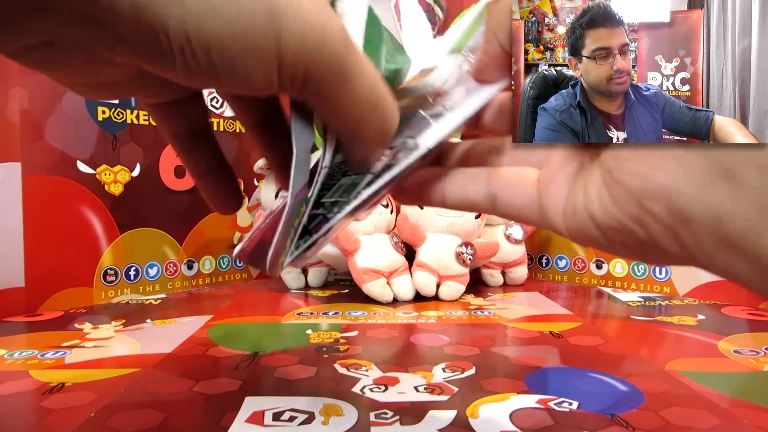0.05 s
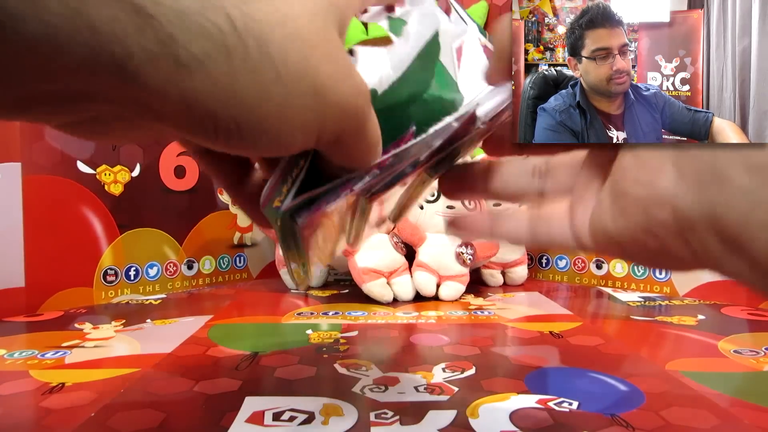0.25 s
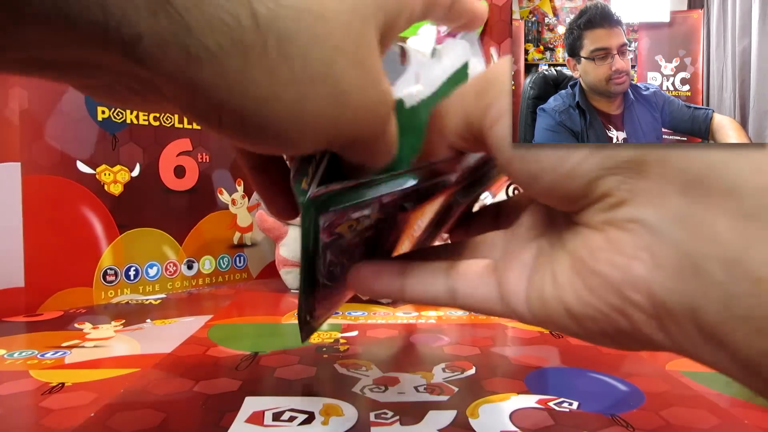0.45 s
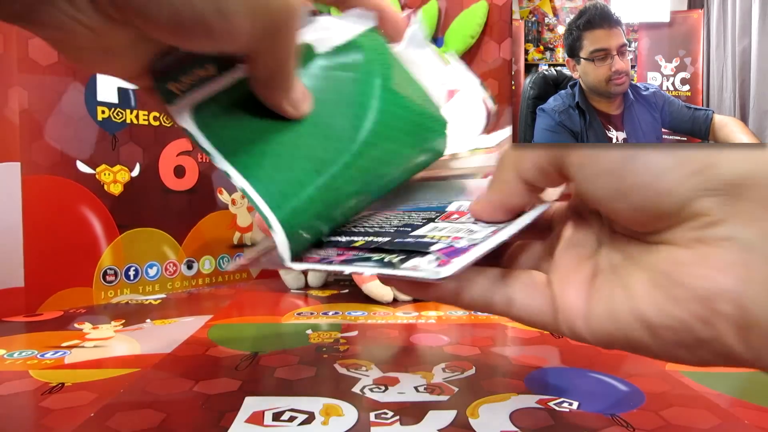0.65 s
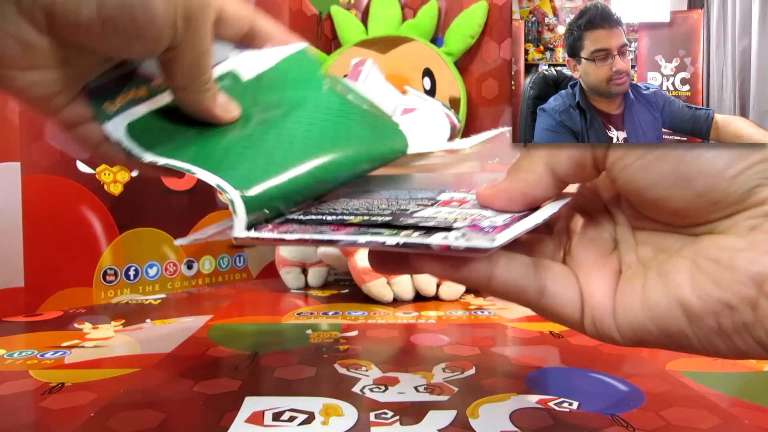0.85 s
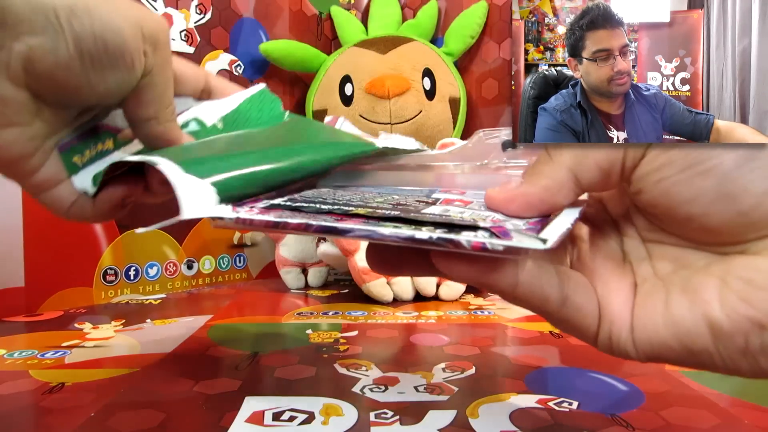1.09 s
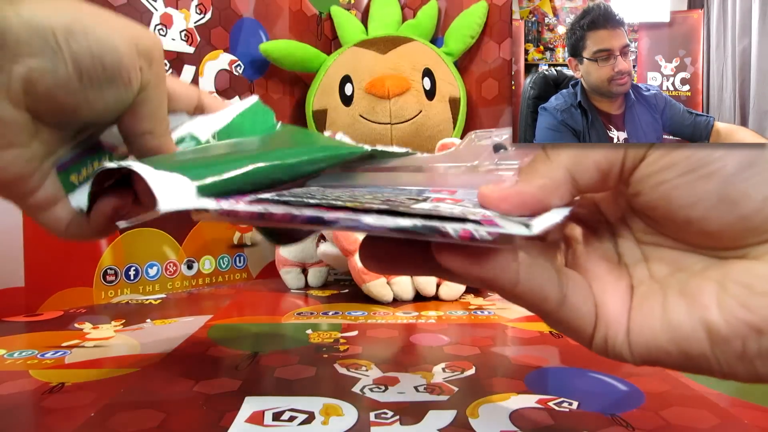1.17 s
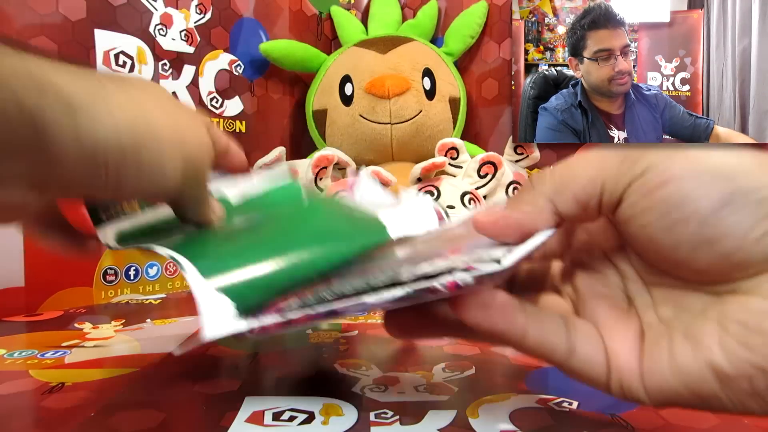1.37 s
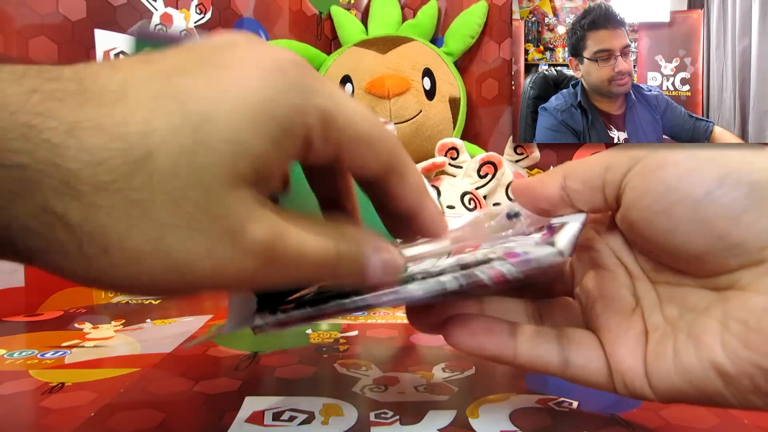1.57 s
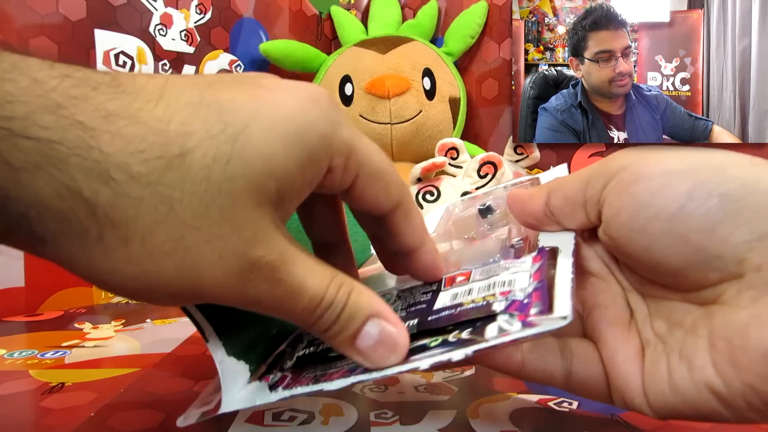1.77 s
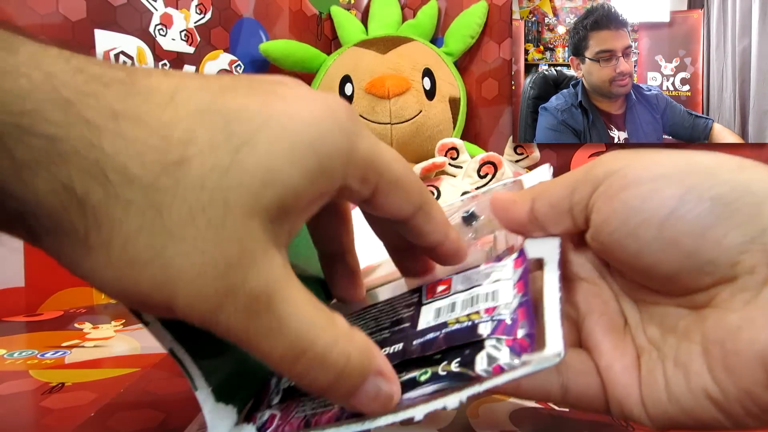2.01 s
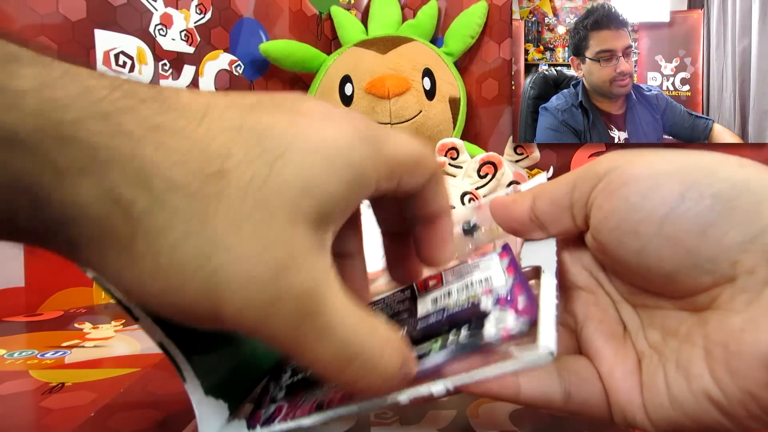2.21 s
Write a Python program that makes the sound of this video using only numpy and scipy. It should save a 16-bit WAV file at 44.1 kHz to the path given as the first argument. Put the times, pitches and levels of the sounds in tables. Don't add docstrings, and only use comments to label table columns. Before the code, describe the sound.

A card-backed plastic pack is torn open by hand with hollow pops, sharp cracks and crackling

```python
import sys
import numpy as np
from scipy import signal
from scipy.fft import rfft, irfft, next_fast_len
from scipy.io import wavfile
from scipy.ndimage import map_coordinates

SR = 44100
rng = np.random.default_rng(int(sys.argv[2]) if len(sys.argv) > 2 else 0)


def decibels_to_gain(level_db):
    exponent = np.asarray(level_db, float) / 20
    return 10 ** exponent


def master_out(mix):
    frames = np.transpose(np.atleast_2d(mix))
    ceiling = np.clip(frames, -1, 1)
    pcm = np.round(ceiling * 32767).astype(np.int16)
    wavfile.write(sys.argv[1], SR, pcm)


N = 99225


def unit(x):
    return x / np.sqrt(np.mean(x ** 2) + 1e-20)


def along(points, hz):
    point_hz, value = np.transpose(points)
    return np.interp(np.log(hz + 1), np.log(point_hz + 1), value)


def curves(rows):
    when_s, *columns = np.transpose(rows)
    t = np.arange(N) / SR
    return [np.interp(t, when_s, column) for column in columns]


def wobble(rate):
    return map_coordinates(rng.standard_normal(1000), [np.arange(N) * rate / SR])


def filtered(x, response):
    size = next_fast_len(x.shape[-1] + 8192)
    spectrum = rfft(x, size) * response(np.fft.rfftfreq(size, 1 / SR))
    return irfft(spectrum, size)[..., :x.shape[-1]]


def peak(f, hz, width_hz):
    return 1j * f * width_hz / (hz * hz - f * f + 1j * f * width_hz + 1e-9)


def apart(pair):
    difference = 0.4 * pair[1]
    return np.array([pair[0] + difference, pair[0] - difference])


# pitch_hz [Hz], width_hz [Hz], level_db [dB]
CARD_MODES = [(296, 140, 1.5), (810, 228, 4), (1240, 143, 7), (1410, 500, 1), (2020, 415, 3.5),
              (3110, 970, -2.5)]


def card_body(f, uneven_db):
    total = 0
    for k, (hz, width_hz, level_db) in enumerate(CARD_MODES):
        total = total + (-1) ** k * decibels_to_gain(level_db + uneven_db[k]) * peak(f, hz, width_hz)
    return total


# start_s [s], level_db [dB peak], pitch_hz [Hz], fade_60db_s [s]
CARD_POPS = [(0.204, -16.5, 1770, 0.018), (0.212, -19, 1980, 0.031), (0.2378, -1.5, 1660, 0.033),
             (0.246, -6.5, 765, 0.06), (0.254, -7.5, 930, 0.018), (0.323, -24.5, 940, 0.047),
             (0.338, -13.5, 2025, 0.043), (0.372, -17.5, 2200, 0.069), (0.415, -11.5, 1020, 0.028),
             (0.421, -10, 2340, 0.026), (0.592, 1.5, 1247, 0.053), (0.599, -9.5, 722, 0.12),
             (0.6245, -2.5, 1920, 0.04), (0.638, -3.5, 2080, 0.0057), (0.653, -13.5, 1780, 0.024),
             (0.697, -19, 1250, 0.024), (0.7212, -12.5, 1404, 0.049), (0.877, -25.5, 1070, 0.033),
             (1.1238, -27, 710, 0.036), (1.2302, -12, 750, 0.02), (1.358, -32, 855, 0.018),
             (1.397, -21.5, 1145, 0.047), (1.604, -29.5, 845, 0.017), (1.702, -22, 883, 0.041),
             (1.735, -11, 2020, 0.012), (1.737, -16, 977, 0.055), (1.857, -39, 950, 0.037),
             (1.937, -24, 2230, 0.021), (1.986, -26.5, 1240, 0.017), (2.23, -27, 980, 0.027)]
# start_s [s], level_db [dB peak], pitch_hz [Hz], fade_60db_s
# [s]
MORE_CARD_POPS = [(.096, -26, 1215, 0.049), (.38, -18, 2350, .02), (.387, -15.5, 2070, .02),
                  (.455, -21, 880, .03), (.509, -32.5, 1210, .04), (.5445, -23, 2000, 0.026),
                  (.5555, -23.5, 2260, 0.051), (.81, -32.5, 980, 0.024), (.951, -29, 1000, 0.016),
                  (.975, -23.5, 2080, 0.039), (.997, -24, 2300, 0.014), (1.19, -25.5, 2060, 0.095),
                  (1.424, -30, 1100, 0.013), (1.434, -24.5, 1050, 0.047), (1.724, -41, 940, 0.019),
                  (.5925, -19, 2000, .025), (.626, -4.5, 1208, 0.046), (.239, -7, 830, 0.057),
                  (1.826, -40.5, 1110, 0.048), (1.889, -40, 950, 0.051), (2.044, -33.5, 920, 0.034),
                  (2.111, -36, 900, 0.071)]


def pops(rows):
    sag, sag_s = 0.11, 0.0024
    rise_s, slip_s = 0.00063, 0.00081
    out, t = np.zeros(N + SR), np.arange(SR // 8) / SR
    rise = 1 - np.exp(-t / rise_s)
    for start_s, level_db, hz, fade_s in rows:
        noise = rng.standard_normal(len(t))
        uneven_db = 0.27 * rng.standard_normal(len(CARD_MODES))
        slip = noise * (decibels_to_gain(-60 * t / fade_s) + 2 * np.exp(-t / slip_s)) * rise
        ring = filtered(slip, lambda f: peak(f, hz, hz / 1.9) * card_body(f, uneven_db))
        turns = hz * (t + sag * sag_s * (1 - np.exp(-t / sag_s)))
        note = np.sin(2 * np.pi * turns) * decibels_to_gain(-60 * t / (0.84 * fade_s)) * rise
        pop = decibels_to_gain(4) * ring / np.abs(ring).max() + note
        out[round(start_s * SR):][:len(t)] += decibels_to_gain(level_db - 3) * pop / np.abs(pop).max()
    return out[:N]


# start_s [s], level_db [dB peak], pitch_hz [Hz], bright_edge_db [dB]
SHELL_CRACKS = [(0.1326, -17.5, 5500, 21), (0.2354, -22, 5400, -6), (0.258, -15.5, 6400, 3),
                (0.339, -18.5, 4940, -7), (0.4207, -11.5, 5630, 15), (0.4612, -7, 5680, 0),
                (0.4704, -42, 5350, -6), (0.5445, -16, 5880, 0), (0.5536, -20, 5830, -25),
                (0.5922, 1, 7600, 3), (0.6255, -3.5, 6000, 3), (0.6384, -6.5, 5130, 6),
                (0.7213, -12, 4900, -1), (0.729, -20, 8000, -13), (1.0188, -18, 7050, 7),
                (1.0316, -20.5, 6800, -42), (1.0605, -20.5, 5120, -7.5), (1.1245, -21.5, 4400, -1),
                (1.1431, -14, 6900, 11), (1.26, -20, 9500, 15), (1.439, -15, 5100, -6),
                (1.7356, -14.5, 6160, -36), (1.7444, -23.5, 5600, -32), (1.857, -35.5, 4350, -18),
                (1.937, -24.5, 4360, -48), (1.9864, -16.5, 4350, 30), (2.0438, -29.5, 4770, 9),
                (2.0604, -26, 3880, -30), (2.073, -32, 7000, -23)]
# start_s [s], level_db [dB peak], pitch_hz [Hz], bright_edge_db [dB]
FILM_TICKS = [(.0887, -39, 5170, -4), (.3222, -23, 3170, 4), (.4145, -20, 5230, -3), (.489, -42, 6500, -3),
              (.549, -20, 5800, -7), (.6968, -41, 5660, -3), (.7905, -25.5, 5460, -7), (.835, -37, 9100, 0),
              (.8769, -24, 3500, -12), (.934, -28, 3030, -27), (.96, -22.5, 3570, -3),
              (1.007, -22.5, 9200, -7), (1.089, -30, 5100, -18), (1.134, -22, 5860, -5.5),
              (1.171, -30, 7040, -3), (1.182, -40, 7000, 4), (1.1945, -22.5, 6600, 5),
              (1.2015, -23.5, 7600, 0), (1.2311, -19, 4340, -15), (1.272, -27, 4470, -3),
              (1.3583, -35, 3300, -16), (1.3985, -21, 3350, -10), (1.434, -28, 5330, -11),
              (1.443, -16, 2840, -18), (1.6033, -37, 5520, 0), (1.947, -26, 2380, -17),
              (1.995, -42, 5000, -1), (1.7015, -26, 2570, -6), (2.2303, -37, 3200, -21)]


def cracks(rows):
    snap_fade_s, rattle_fade_s, note_fade_s = 0.0073, 0.11, 0.015
    rise_s = 0.00057
    edge_hz, edge_width_hz = 4700, 9100
    out, t = np.zeros((2, N + SR)), np.arange(SR // 10) / SR
    fade = decibels_to_gain(-60 * t / snap_fade_s) + decibels_to_gain(-21.5 - 60 * t / rattle_fade_s)
    fade = fade * (1 - np.exp(-(t / rise_s) ** 2))
    for start_s, level_db, hz, edge_db in rows:
        burst = rng.standard_normal((2, len(t))) * fade

        def shell(f):
            edge = decibels_to_gain(edge_db + 0.5) * peak(f, edge_hz, edge_width_hz) ** 2
            return peak(f, hz, hz / 1.42) ** 2 + edge

        snap = filtered(burst, shell)
        note_level = decibels_to_gain(-9 - 60 * t / note_fade_s - max(edge_db, -6))
        note = note_level * np.sin(2 * np.pi * hz * t)
        crack = snap / np.abs(snap[0]).max() + note * [[1], [0.3]]
        out[:, round(start_s * SR):][:, :len(t)] += decibels_to_gain(level_db - 4) * crack
    return apart(out[:, :N])


# start_s [s], level_db [dB peak], pitch_hz [Hz]
PACK_JOLTS = [(0.237, -12.5, 373), (0.336, -23.5, 278), (0.415, -13.5, 355), (0.592, -10, 319),
              (0.636, -15, 304), (1.297, -34.5, 305), (1.396, -28.5, 332), (1.602, -33.5, 224),
              (1.857, -40.5, 390), (2.043, -37, 505), (.44, -46, 49.6), (0.591, -34, 60.4), (.63, -42, 81),
              (1.299, -48, 71)]


def thumps():
    out, t = np.zeros(N + SR), np.arange(SR // 5) / SR
    for start_s, level_db, hz in PACK_JOLTS:
        life = t * hz / 5.1
        shape = np.exp(-3 * life) * (1 - np.exp(-30 * life))
        jolt = np.sin(2 * np.pi * hz * t) * shape
        out[round(start_s * SR):][:len(t)] += decibels_to_gain(level_db - 4) * jolt
    return out[:N]


def crackle(spectrum, spread_db, life_s, hiss_db, count):
    when, size = rng.random((count, 2)).T
    hits = np.bincount((when * N).astype(int), decibels_to_gain(-spread_db * np.log(size + 0.002)), N)
    fade = np.exp(-np.arange(400) / (SR * life_s))
    bursts = unit(signal.fftconvolve(hits, fade)[:N]) + decibels_to_gain(hiss_db)
    noise = bursts * rng.standard_normal((2, N))
    return unit(filtered(noise, lambda f: decibels_to_gain(along(spectrum, f))))


def blips(count):
    when, size, which = rng.random((count, 3)).T
    hz = 3648 * 2 ** (0.76 * rng.standard_normal(count))
    hz = np.clip(hz, 1200, SR / 3)[:, None]
    k = np.arange(256)
    fade = np.exp(-k * hz / (SR * 66 / 2))
    notes = np.sin(2 * np.pi * hz * k / SR) * fade * decibels_to_gain(-4 * np.log(size + 0.05))[:, None]
    at = (when * N + (which > 0.5) * 2 * N).astype(int)[:, None] + k
    return unit(np.bincount(at.ravel(), notes.ravel(), 4 * N).reshape(2, -1)[:, :N])


# pitch_hz [Hz], level_db [dB]
PAPER_COLOUR = [(60, -44), (200, -32), (350, -4), (570, -13), (900, -4), (2100, -5.5), (4000, -12.5),
                (9000, -23)]
# pitch_hz [Hz], level_db [dB]
FILM_COLOUR = [(120, -9), (500, -5.5), (900, -7.5), (2500, -11), (5200, 6.5), (8000, 4), (12000, -1),
               (16000, -5)]
# start_s [s], effort_db [dB], film_over_paper_db [dB]
RUBBING_EFFORT = [
    (0, -48, 4),
    (.13, -29, 1.5),
    (.2, -34.5, 1.5),
    (.3, -34, -10.5),
    (.39, -32.5, 1),
    (.52, -38, -1.5),
    (.66, -42, 13.5),
    (.74, -32.5, -4.5),
    (.86, -44.5, 2.5),
                  (0.878, -37, 0),
    (1.02, -36, 5),
    (1.1, -33.5, -5),
    (1.14, -31, -4),
    (1.262, -33.5, -4.5),
    (1.35, -51, -5.5),
    (1.365, -37, -3.5),
    (1.439, -32, 4),
    (1.453, -47, 7.5),
                  (1.5, -44, 3.4),
    (1.535, -42, 2.3),
    (1.575, -52.5, 6.5),
                  (1.592, -55, 11),
    (1.611, -42, 4),
    (1.689, -43, -2),
    (1.746, -29.5, -12),
    (1.83, -69.5, 5),
    (1.947, -41, 3.5),
    (2.09, -46.5, -3),
    (2.162, -47.5, 4.5),
    (2.25, -60, 5),
]


def rubbing():
    effort_db, film_db = curves(RUBBING_EFFORT)
    clumps_db = wobble(25)
    paper = crackle(PAPER_COLOUR, 3.5, 0.011, 0.35, count=900)[0]
    paper = decibels_to_gain(clumps_db + wobble(39.06)) * paper
    film = crackle(FILM_COLOUR, 2.6, 0.0014, 1.5, count=1200) + decibels_to_gain(-3) * blips(count=2500)
    sheen = filtered(film, lambda f: 1 / (1 + (9000 / (f + 1)) ** 4))
    sheen_gain = decibels_to_gain(0.42 * (effort_db - effort_db.max()))
    film = film + (sheen_gain - 1) * sheen
    film_gain = decibels_to_gain(film_db + clumps_db + wobble(69.08))
    return decibels_to_gain(effort_db - 7) * (paper + film_gain * apart(film))


# pitch_hz [Hz], fade_60db_s [s]
ROOM_FADE = [(200, 0.17), (2000, 0.17), (10000, 0.073)]


def room(x):
    alike = 0.34
    piece = SR // 3
    out = np.zeros((2, N + SR))
    for a in range(0, N, piece):
        hz, t, z = signal.stft(rng.standard_normal((2, piece)), SR, nperseg=256)
        fade = decibels_to_gain(-60 * t / along(ROOM_FADE, hz)[:, None])
        tail = signal.istft(z * fade, SR, nperseg=256)[1]
        tail = decibels_to_gain(-10.5) * tail / np.linalg.norm(tail[0])
        tail[1] = alike * tail[0] + np.sqrt(1 - alike ** 2) * tail[1]
        tail[:, rng.integers(0, 700, size=6)] += decibels_to_gain(-30.5) * rng.standard_normal(6)
        wet = signal.fftconvolve(x[None, a:a + piece], tail, axes=1)
        start = a + 150
        out[:, start:start + wet.shape[1]] += wet
    return out[:, :N]


# pitch_hz [Hz], left_minus_right_db [dB]
PORT_BALANCE = [(60, -7), (250, -11), (700, -5.5), (2400, -2.5), (6000, -2.5), (15000, -4.5)]
# pitch_hz [Hz], left_lead_rad [radians]
PORT_LEAD = [(50, 1.8), (260, 1.1), (1290, 0.6), (3200, 0.1), (7600, 0.17)]


def microphone_ports(x):
    side = np.array([[0.5], [-0.5]])

    def ports(f):
        return decibels_to_gain(side * along(PORT_BALANCE, f)) * np.exp(1j * side * along(PORT_LEAD, f))

    return filtered(x, ports)


# pitch_hz [Hz], level_db [dB]
HISS_COLOUR = [(15, -47), (40, -17), (125, -18), (754, -25), (1330, -20), (3520, -31), (7710, -29.5),
               (16000, -48)]
# pitch_hz [Hz], level_db [dB rms]
HUM_AND_WHINE = [
    (125.5, -66),
    (7865, -68),
    (15735, -83),
]
# start_s [s], gain_db [dB]
CAMERA_GAIN = [
    (0, 6),
    (.6, -23),
    (1.5, 1),
    (2.25, 4),
]


def room_tone():
    t = np.arange(N) / SR
    hiss = unit(filtered(rng.standard_normal((2, N)), lambda f: decibels_to_gain(along(HISS_COLOUR, f))))
    lines = np.zeros(N)
    for hz, level_db in HUM_AND_WHINE:
        level = decibels_to_gain(level_db + 3 + wobble(8))
        lines += level * np.sin(2 * np.pi * hz * t + 0.8 * wobble(12))
    return decibels_to_gain(curves(CAMERA_GAIN)[0]) * (decibels_to_gain(-53) * hiss + lines)


def scene():
    card = pops(CARD_POPS) + pops(MORE_CARD_POPS) + thumps()
    plastic = cracks(SHELL_CRACKS) + cracks(FILM_TICKS)
    pack = card + plastic + rubbing()
    return microphone_ports(pack + room(pack.mean(0))) + room_tone()


def top_cut(x):
    return signal.sosfilt(signal.butter(12, 16670, fs=SR, output="sos"), x)


def record(dry):
    clipped = dry / (1 + np.abs(dry) ** 8) ** (1 / 8)
    limited = filtered(clipped, lambda f: 1 / (1 + (f / 15700) ** 60))
    return top_cut(limited)


dry = scene()
out = record(dry)
master_out(out)
```